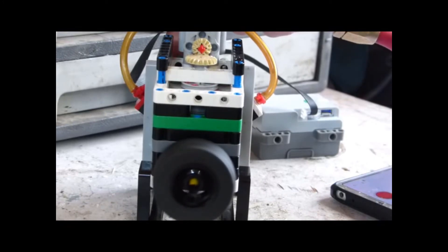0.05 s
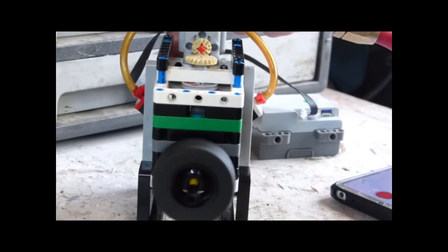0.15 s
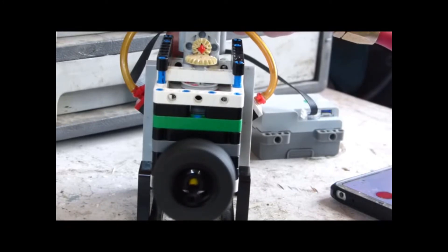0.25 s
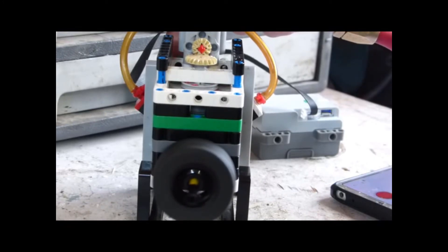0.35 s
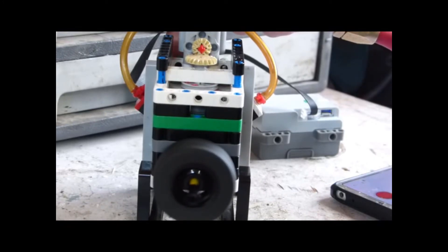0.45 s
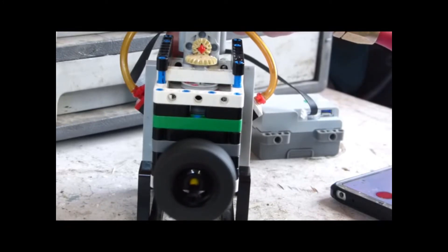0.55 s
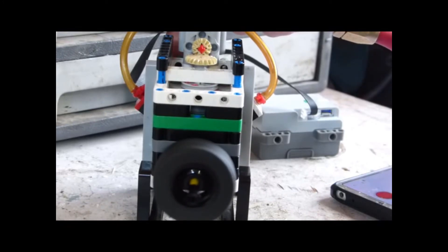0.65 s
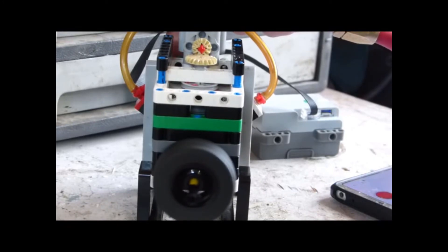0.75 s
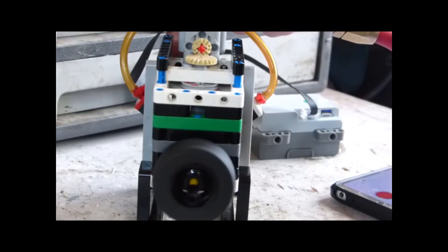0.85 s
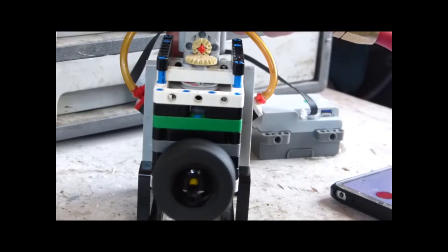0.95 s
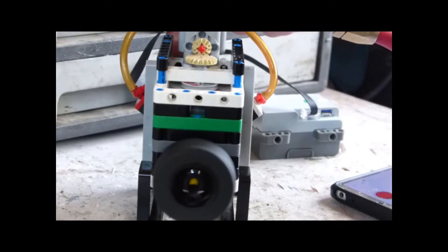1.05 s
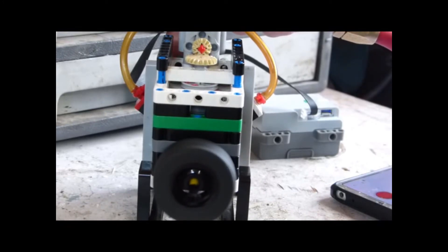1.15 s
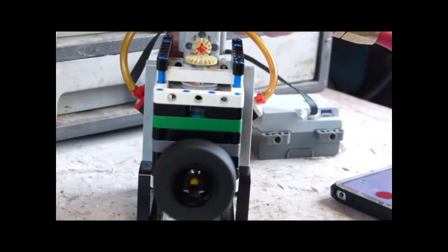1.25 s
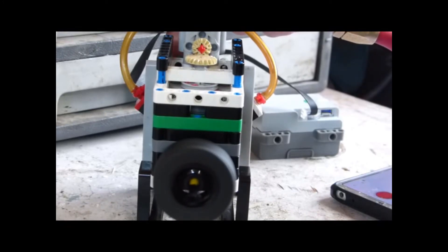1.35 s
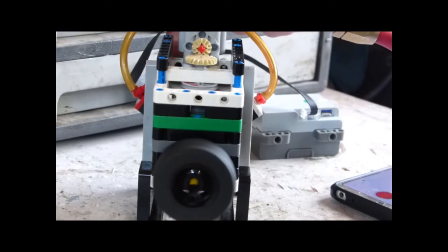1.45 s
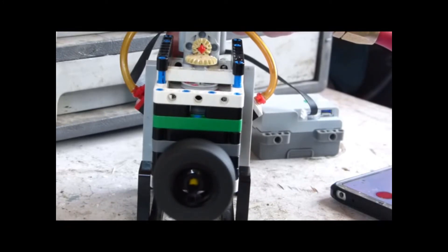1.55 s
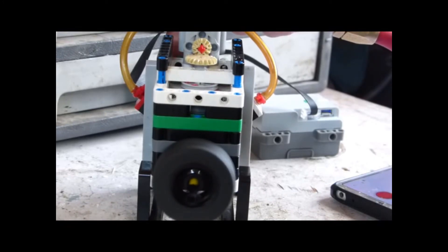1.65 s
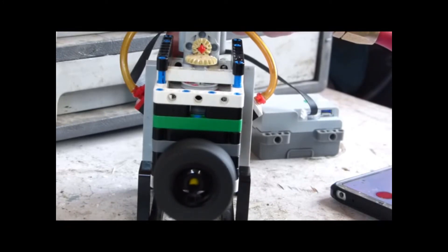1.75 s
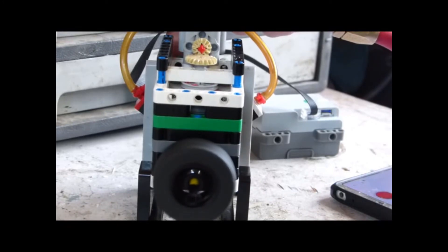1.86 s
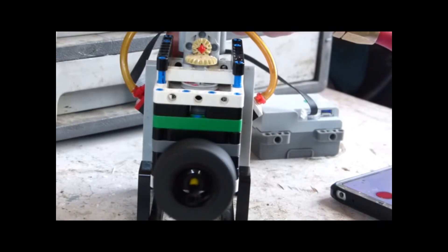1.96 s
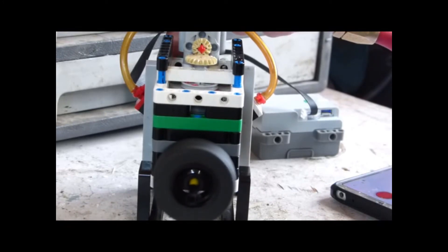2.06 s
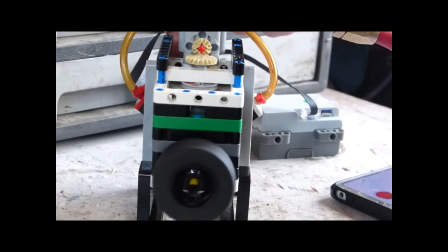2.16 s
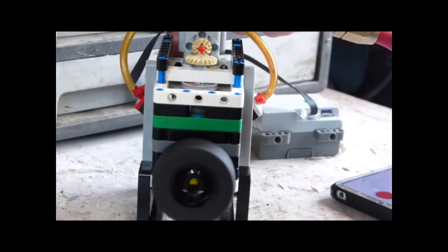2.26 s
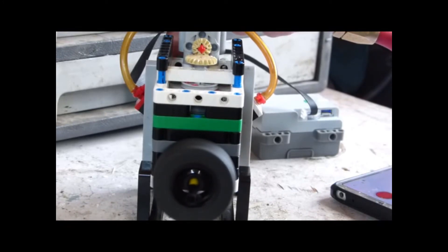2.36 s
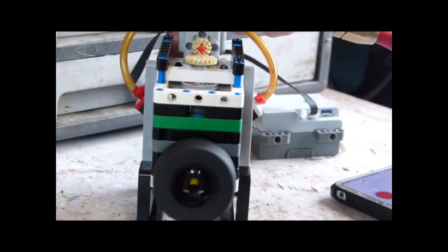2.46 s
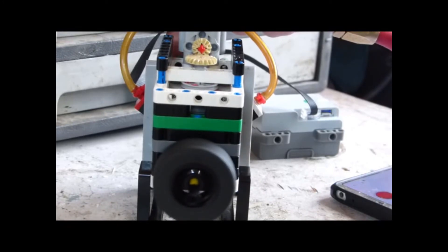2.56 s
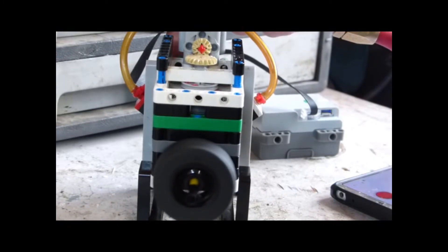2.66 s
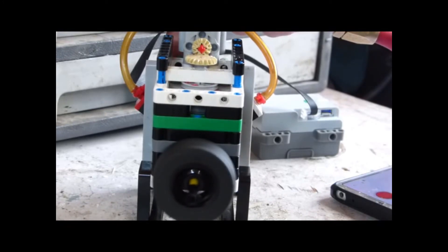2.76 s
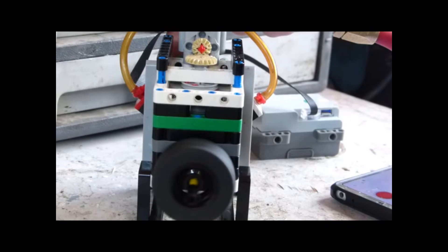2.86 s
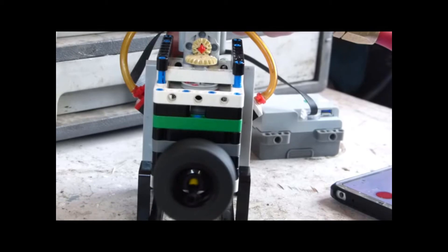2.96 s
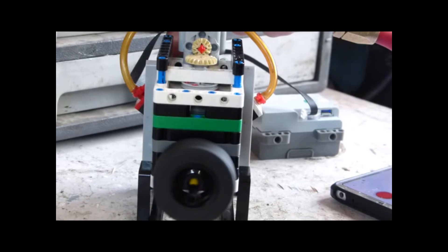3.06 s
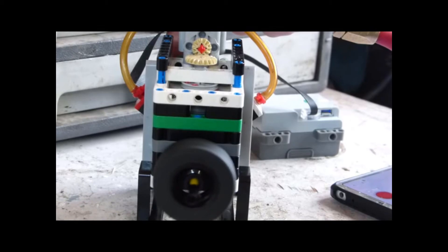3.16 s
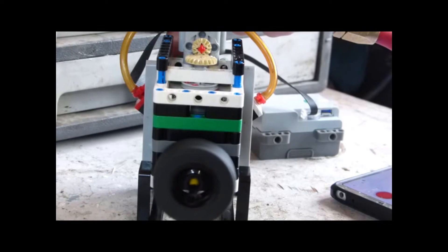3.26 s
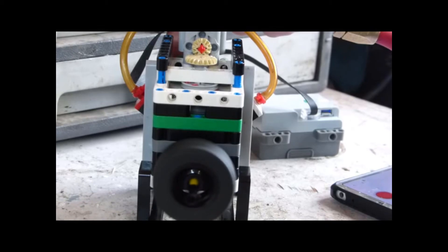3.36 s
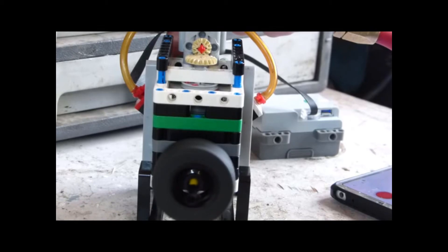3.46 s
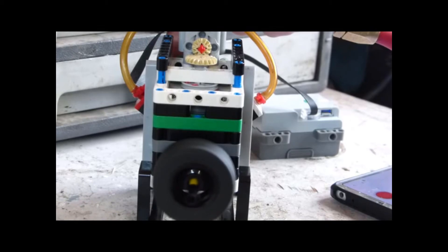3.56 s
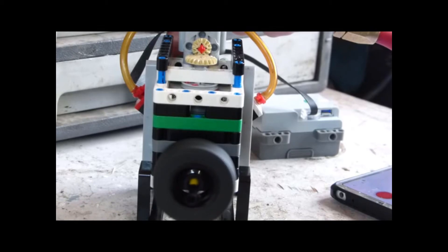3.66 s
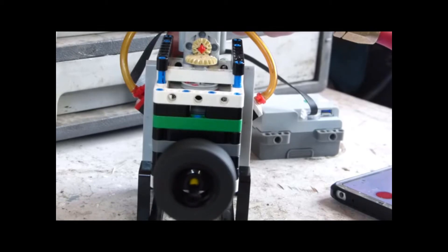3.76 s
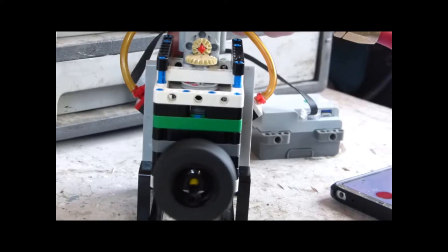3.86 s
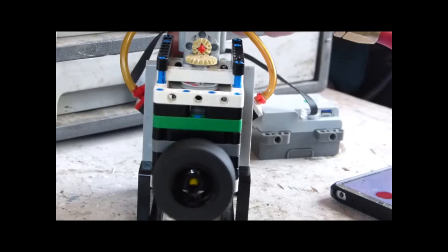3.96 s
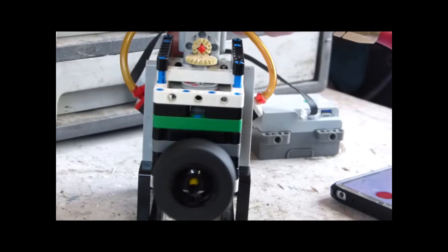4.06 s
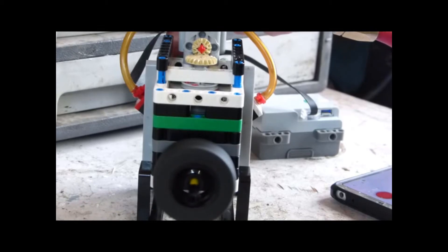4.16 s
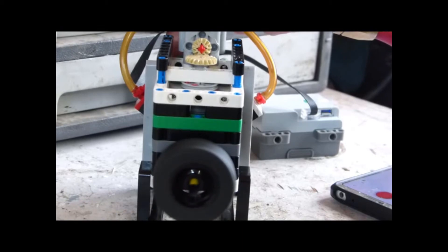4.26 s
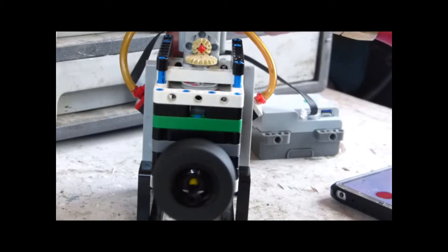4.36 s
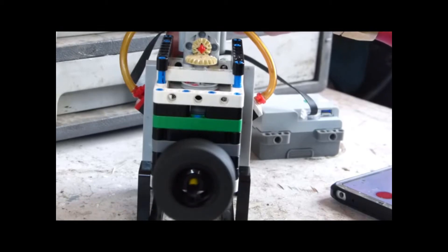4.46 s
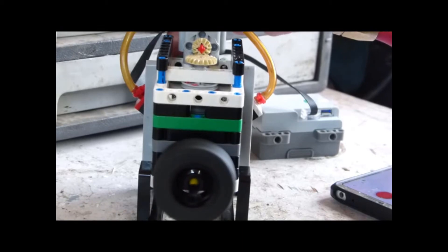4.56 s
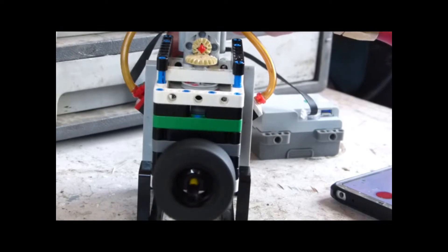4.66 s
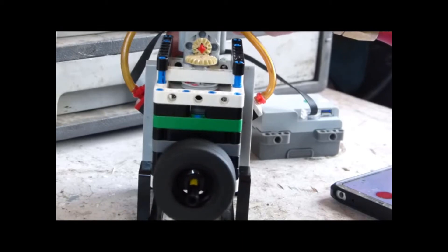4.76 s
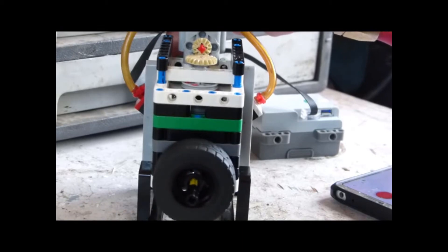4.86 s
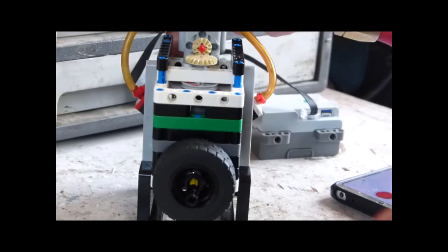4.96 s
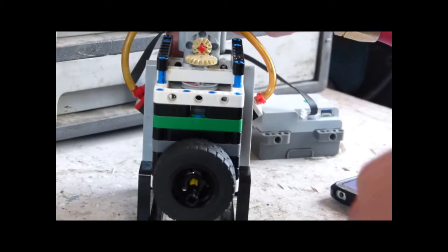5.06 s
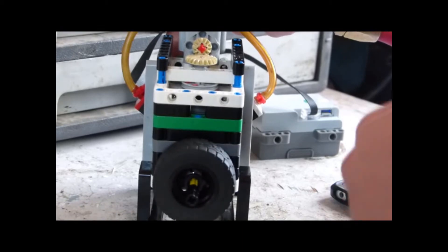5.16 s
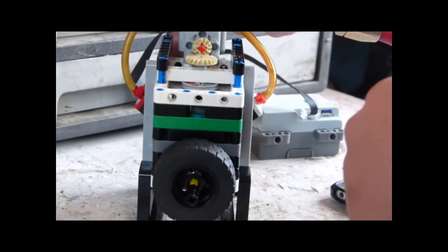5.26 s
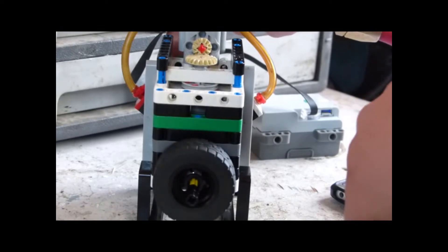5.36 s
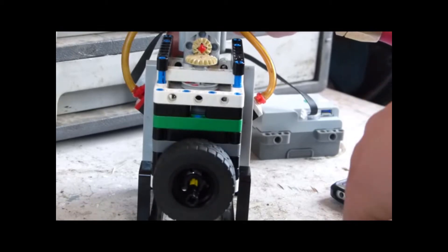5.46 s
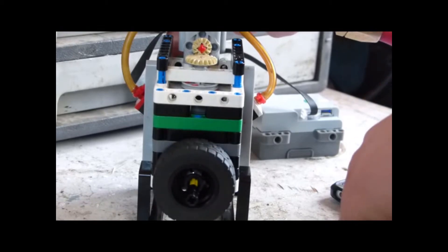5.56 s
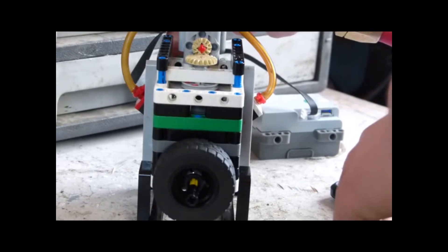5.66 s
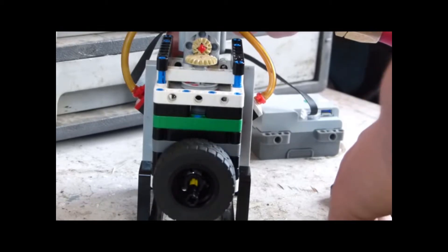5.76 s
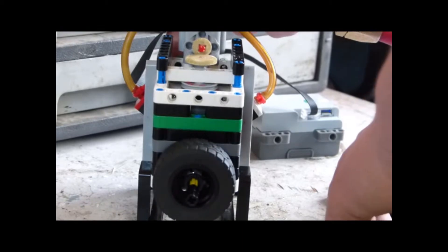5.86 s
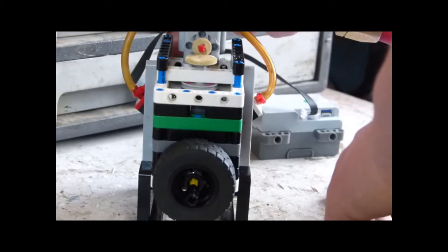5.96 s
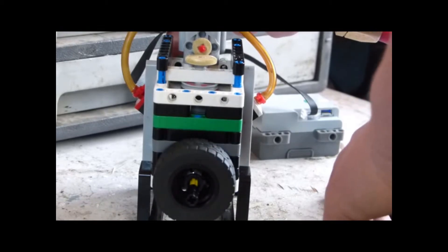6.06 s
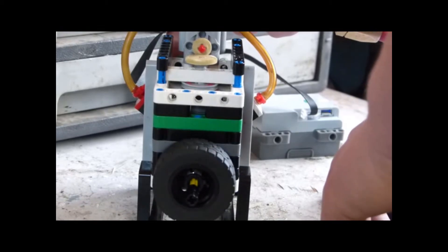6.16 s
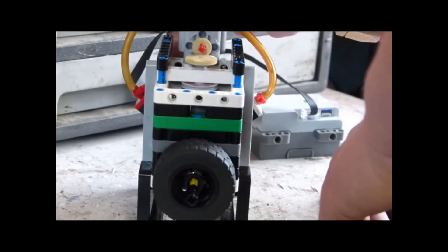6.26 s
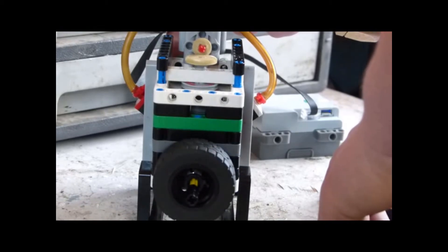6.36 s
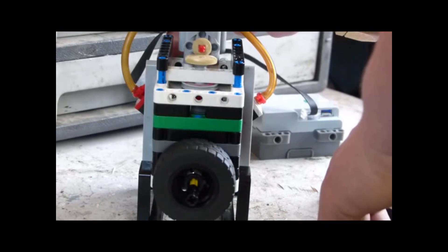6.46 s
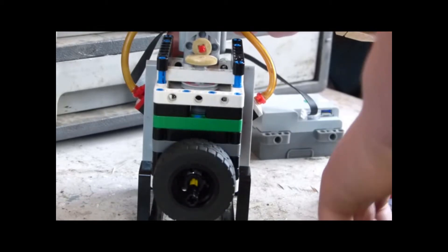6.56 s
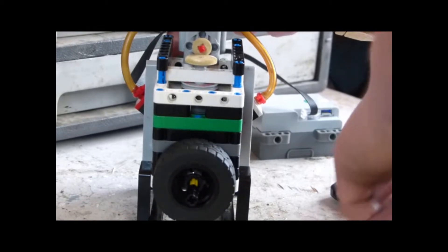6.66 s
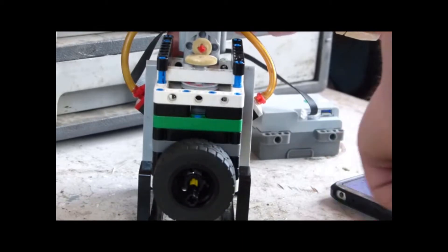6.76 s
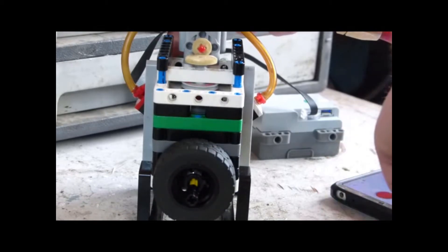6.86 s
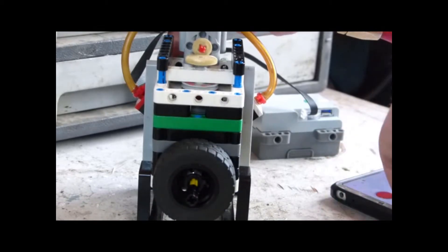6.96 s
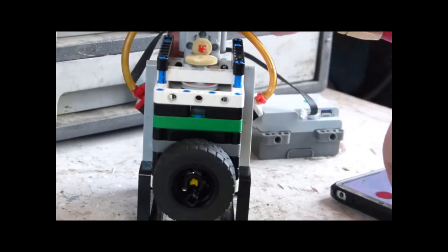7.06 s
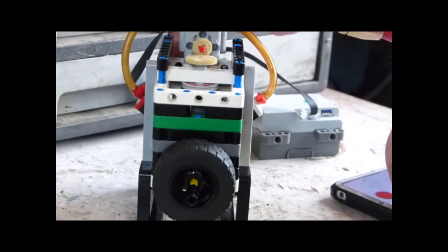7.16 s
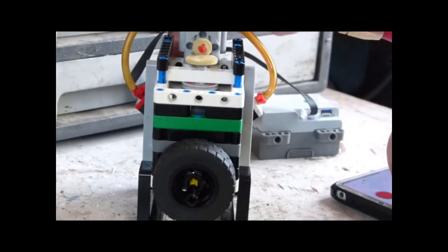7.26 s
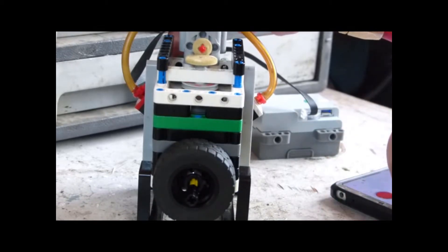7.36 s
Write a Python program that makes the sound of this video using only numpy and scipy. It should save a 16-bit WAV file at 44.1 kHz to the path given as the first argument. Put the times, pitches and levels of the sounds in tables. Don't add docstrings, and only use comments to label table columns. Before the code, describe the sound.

A small plastic air engine clatters rapidly with hissing puffs, stops abruptly, leaves faint room murmur, then a small electric motor whines up and holds.

```python
import sys
import numpy as np
from scipy import signal
from scipy.fft import rfft, irfft, next_fast_len
from scipy.io import wavfile
from scipy.ndimage import map_coordinates

SR = 44100
rng = np.random.default_rng(int(sys.argv[2]) if len(sys.argv) > 2 else 0)


def master_out(mix):
    frames = np.transpose(np.atleast_2d(mix))
    ceiling = np.clip(frames, -1, 1)
    pcm = np.round(ceiling * 32767).astype(np.int16)
    wavfile.write(sys.argv[1], SR, pcm)


def invert_db(x):
    u = np.asarray(x, float) / 20
    return 10 ** u


N = 327222
TIME = np.arange(N) / SR

# (time [s], speed [turns/s])
SPEED = [
    (0, 38.591),
    (1.7, 38.569),
    (2.3, 38.396),
    (3.5, 38.358),
    (4.38, 38.162),
    (4.58, 37.165),
    (4.8, 37.933),
    (5.156, 37.792),
]
DRIVE_END = SPEED[-1][0]
SNUG = .9


def unit(x):
    return x / np.sqrt(np.mean(x ** 2) + 1e-20)


def along(points, hz):
    f, value = np.transpose(points)
    return np.interp(np.log(hz + 1), np.log(f + 1), value)


def curve(rows):
    s, value = np.transpose(rows)
    return np.interp(TIME, s, value)


def wobble(rate):
    knots = rng.standard_normal(int(N * rate / SR) + 4)
    return map_coordinates(knots, [TIME * rate], order=1)


def filtered(x, response):
    m = next_fast_len(N + 8192)
    spectrum = rfft(x, m) * response(np.fft.rfftfreq(m, 1 / SR))
    return irfft(spectrum, m)[..., :N]


def body(modes):
    def response(f):
        total = 0
        for k, (centre, width, db) in enumerate(modes):
            damping = 1j * f * width
            total = total + (-1) ** k * invert_db(db) * damping / (centre * centre - f * f + damping)
        return total
    return response


def noise(spectrum):
    return unit(filtered(rng.standard_normal(N), lambda hz: invert_db(along(spectrum, hz))))


def crank():
    left = np.clip(1 - (TIME - DRIVE_END) / .255, 1e-4, 1)
    speed = curve(SPEED) * left
    return left, speed, -.66 + np.cumsum(speed) / SR


def contacts(turns, angles, rows, modes, alike=0):
    whole = np.arange(0, turns[-1] - 1)
    drive = np.zeros(N + 512)
    k = np.arange(256)
    for angle, (db, scatter_db, jitter, length) in zip(angles, rows):
        size, late = rng.standard_normal((len(whole), 2)).T
        start = np.interp(whole + angle + jitter * late, turns, TIME, right=N / SR) - 1.5 * length
        grit = rng.standard_normal((len(whole), len(k)))
        shape = (k / SR / length) ** 2 * np.exp(-2 * k / SR / length)
        burst = shape * (alike * grit[0] + np.sqrt(1 - alike ** 2) * grit)
        burst *= (invert_db(db + scatter_db * size) / np.linalg.norm(burst, axis=1))[:, None]
        places = np.clip(start * SR, 0, N).astype(int)[:, None] + k
        drive += np.bincount(places.ravel(), burst.ravel(), N + 512)
    small = lambda f: -f * f / (1200 ** 2 - f * f + 1700j * f)
    return unit(filtered(drive[:N], lambda f: small(f) * body(modes)(f)))


def valve_ticks(turn):
    tick_at = [0]
    slider_at = [-.28, -.2]
    # (level [dB], size scatter [dB], timing scatter [turn], length [s])
    tick = [(0, 1, .0005, .00006)]
    slider = [(0, 1.5, .0012, .0001), (-5, 2, .0008, .0002)]
    # (centre [Hz], width [Hz], level [dB])
    tick_body = [(8350, 750, 0), (5300, 900, -10), (4100, 700, -11)]
    slider_body = [(5600, 900, 0), (9200, 1000, 0)]
    ticks = invert_db(-10.5) * contacts(turn, tick_at, tick, tick_body, SNUG)
    return ticks + invert_db(-13.5) * contacts(turn, slider_at, slider, slider_body, SNUG)


def clacks(turn):
    clack_at = [.16, .46]
    pin_at = [-.28, -.21, -.075, -.01, .055]
    # (level [dB], size scatter [dB], timing scatter [turn], length [s])
    clack = [(2, 1.9, .018, .0009), (-3, 2.2, .02, .0009)]
    pin = [(-4, 2, .001, .00008), (-3, 3, .001, .0001), (0, 1, .001, .00008), (-2, 1.5, .001, .00008),
           (-3, 1.5, .001, .00008)]
    # (centre [Hz], width [Hz], level [dB])
    clack_body = [(2110, 710, -4.5), (4070, 2200, -3.5), (5600, 1800, 2.5), (9700, 1500, 6.5)]
    pin_body = [(1660, 720, -12.5), (2630, 340, -6.5), (5160, 820, -3)]
    # (centre [Hz], width [Hz], level [dB])
    loose_parts = [(1750, 260, -18.5), (2250, 260, -18.5), (4150, 400, -16.5), (5600, 500, -18),
                   (8800, 900, -16)]
    knocks = invert_db(-11.5) * contacts(turn, clack_at, clack, clack_body)
    knocks = knocks + invert_db(-18) * contacts(turn, pin_at, pin, pin_body, SNUG)
    rattle = sum(invert_db(db) * contacts(turn, clack_at, clack, [(hz, width, 0)])
                 for hz, width, db in loose_parts)
    return knocks + rattle


def mesh(turn):
    wear = 14
    rows = int(turn[-1] / wear) + 3
    wheel = rng.standard_normal((rows, 1145))
    wheel = wheel + .8 * np.tile(rng.standard_normal((rows, 229)), 5)
    return unit(map_coordinates(wheel, [1 + turn / wear, turn % 1 * wheel.shape[1]], mode="grid-wrap"))


def air_hiss(left, turn):
    # (frequency [Hz], spectrum level [dB per Hz])
    hiss_spectrum = [(20, -36), (40, -21.5), (150, -19.5), (300, -17), (500, -13), (900, -13.5),
                     (1500, -9.5), (2000, -5.5), (3000, -8.5), (4100, -7.5), (6500, -4), (8700, -1),
                     (10300, -7.5), (11000, -44)]
    # (centre [Hz], width [Hz], level [dB])
    frame = (4120, 260, -3)
    gusts = 1.04 * np.cos(2 * np.pi * (turn - .05)) + 1.8 * np.cos(6 * np.pi * (turn - .12))
    leak = invert_db(gusts + 2.0 * wobble(400))
    mesh_share = .42
    grit = np.sqrt(1 - mesh_share) * rng.standard_normal(N) + np.sqrt(mesh_share) * left * mesh(turn)
    colour = lambda hz: invert_db(along(hiss_spectrum, hz)) * (1 + body([frame])(hz))
    return unit(leak * filtered(grit, colour))


def cylinder(speed, turn):
    # (multiple of crank rate, level [dB])
    multiples = [(1, -27), (3, -29), (4, -19), (5, -18), (6, -23), (7, -18), (8, -27), (9, -11), (10, -7),
                 (11, -1.5), (12, -7), (13, -10), (14, 1.5), (15, -3), (16, -9.5), (17, -6.5), (18, -10),
                 (19, -9), (20, -19), (21, -15), (22, -10), (23, -19), (28, -18), (29, -12), (30, -14),
                 (36, -18), (37, -8), (38, -13), (42, -9), (45, -13)]
    puffs = [(5, 0), (13, .245), (15, .15), (17, .24), (18, .7), (24, .14), (35, .45), (45, -.13)]
    tops, angles = np.transpose(puffs)
    pipe_db = np.maximum(3 - 16 * (38.6 - speed), -3)
    tone, lag = 0, 0
    for k in range(1, multiples[-1][0] + 1):
        lag += angles[np.searchsorted(tops, k)]
        level = np.interp(k, *np.transpose(multiples)) + (.3 + k / 25) * wobble(6)
        if k == 14:
            level = level + 1.2 * pipe_db + .3
        elif k == 15:
            level = level + 1.4 * pipe_db
        tone = tone + invert_db(level) * np.cos(2 * np.pi * (k * turn - lag))
    return tone


def wheeze(left):
    # (centre [Hz], width [Hz], level [dB])
    hollows = [(395, 130, 0.5), (570, 120, 2), (850, 250, -8.5)]
    level = invert_db(-29.5) * np.sqrt(1 - left) * left ** 3.2 + invert_db(-53) * left
    return level * unit(filtered(rng.standard_normal(N), body(hollows)))


def engine():
    left, speed, turn = crank()
    bleed = invert_db(-15.5 - 60 * (TIME - DRIVE_END) / 1.5) * (1 - left)
    running = invert_db(-200 * np.clip(TIME - 5.45, 0, 1))
    clatter = invert_db(-1.5) * air_hiss(left, turn) + valve_ticks(turn) + clacks(turn)
    clatter = invert_db(-22.5) * (left ** 1.62 + bleed) * clatter
    tone = invert_db(-39) * left ** 6.7 * cylinder(speed, turn)
    return running * (clatter + tone + wheeze(left))


def room():
    # (frequency [Hz], spectrum level [dB per Hz])
    rumble = [(20, -16), (70, -29), (200, -3.5), (320, -10), (900, -7.5), (1600, -12.5), (2200, -21.5),
              (4300, -30.5), (5000, -20.5), (5450, -18.5), (5900, -23), (8000, -24.5), (10400, -24.5)]
    # (centre [Hz], width [Hz], level [dB])
    room_modes = [(247, 28, -5.5), (390, 11, -0.5), (702, 28, 1), (905, 20, 1), (953, 10, -2.5),
                  (1214, 16, -4)]
    hum = sum(invert_db(3.6 * wobble(9.2)) * filtered(rng.standard_normal(N), body([mode]))
              for mode in room_modes)
    duck_db = -1 * np.exp(-np.clip(TIME - 5.5, 0, None) / 0.089)
    level = invert_db(-55.5 + 1.4 * wobble(15) + duck_db)
    return level * (invert_db(1.5) * noise(rumble) + invert_db(0.5) * unit(hum))


def walls():
    # (frequency [Hz], t60 [s])
    decay = [(200, 1), (2000, 0.74), (10000, 0.021)]
    hz, t, z = signal.stft(rng.standard_normal((2, SR // 3)), SR, nperseg=256)
    tail = signal.istft(z * invert_db(-60 * t / along(decay, hz)[:, None]), SR, nperseg=256)[1]
    return tail / np.linalg.norm(tail[0])


def coast_knock():
    # (time [s], peak level [dB])
    knocks = [
        (5.23, -11),
    ]
    # (centre [Hz], width [Hz], level [dB])
    knock_body = [(5600, 900, 0), (9200, 1000, 0)]
    drive, t = np.zeros(N), np.arange(200) / SR
    for s, db in knocks:
        envelope = invert_db(db + 8 - 60 * t / 0.0061) * (1 - np.exp(-t / .0004))
        drive[round(s * SR):][:len(t)] = envelope * rng.standard_normal(len(t))
    return filtered(drive, body(knock_body))


def motor(start=6.366):
    # (time [s], 51st shaft order [Hz])
    shaft_speed = [
        (6.56, 8398),
        (6.68, 8419),
        (7.364, 8415.5),
        (7.4, 8452.5),
    ]
    whine_orders = [1, 3, 8.5, 9, 28, 36, 44, 46, 47, 48, 49, 50, 51, 54, 56, 57, 59, 60]
    whine_db = [-32, -27, -30, -33, -27, -28, -22, -21, -24, -19, -19, -11, -11.5, -11, -17, -17, -14.5,
                -17]
    # (frequency [Hz], spectrum level [dB per Hz])
    brush_spectrum = [(60, -43), (130, -30), (400, -17.5), (1400, -21), (2500, -17), (3300, -23),
                      (4700, -11), (6300, -8.5), (7000, -13.5), (8300, -1), (10200, -7), (11000, -58)]
    # (centre [Hz], width [Hz], level [dB])
    can = (8450, 500, -13)
    squeal = (4900, 200, 0)
    squeal_s = 0.22
    age = np.clip(TIME - start, 0, None)
    spin_up = 1 - np.exp(-(age / .06) ** 1.5)
    shaft = np.cumsum(curve(shaft_speed) / 51 * spin_up * (1 + .0016 * wobble(14))) / SR
    settled = np.clip(age / 0.15, 0, 1) ** 3
    swell = invert_db(-29.5 - 3.5 * np.exp(-age / 0.086) + 0.47 * wobble(14))
    bite = np.clip((TIME - 6.376) / 0.015, 0, 1) ** 2
    level = swell * (bite + invert_db(-27) * (age > 0))
    tones = 0
    for k, db in zip(whine_orders, whine_db):
        strength = invert_db(db + (1.5 + k / 60) * wobble(15))
        tones = tones + strength * np.sin(2 * np.pi * (k * shaft + rng.random()))
    throb = invert_db(0.72 * np.cos(2 * np.pi * shaft) + 0.73 * wobble(600))
    brush = unit(throb * filtered(noise(brush_spectrum), lambda hz: 1 + body([can])(hz)))
    low = filtered(brush, lambda hz: hz < 4400)
    brush = brush - low * np.exp(-(age / .05) ** 2)
    ring = age / squeal_s * np.exp(1 - (age / squeal_s) ** 2)
    brush = brush + filtered(brush, body([squeal])) * ring
    return level * (invert_db(-2.5) * brush + invert_db(3) * settled * tones)


def scene():
    # (frequency [Hz], side minus middle [dB])
    apart = [(60, -26), (110, -34), (190, -48), (340, -27.5), (610, -27.5), (1080, -26.5), (1930, -39),
             (3450, -27.5), (6140, -30.5), (11000, -13.5)]
    tails = walls()
    near = engine() + coast_knock() + motor() + room()
    echo, spread = signal.fftconvolve(near[None], tails, axes=1)[:, :N]
    side = filtered(spread, lambda hz: invert_db(along(apart, hz)) * (hz > 25))
    return near + invert_db(-18) * echo + np.array([side, -side])


def top_cut(x):
    return signal.sosfilt(signal.butter(12, 11560, fs=SR, output="sos"), x)


def record(dry):
    edge = lambda hz: invert_db(-np.clip(hz - 10350, 0, None) / 14)
    mix = filtered(dry, edge)
    return top_cut(mix)


dry = scene()
out = record(dry)
master_out(out)
```